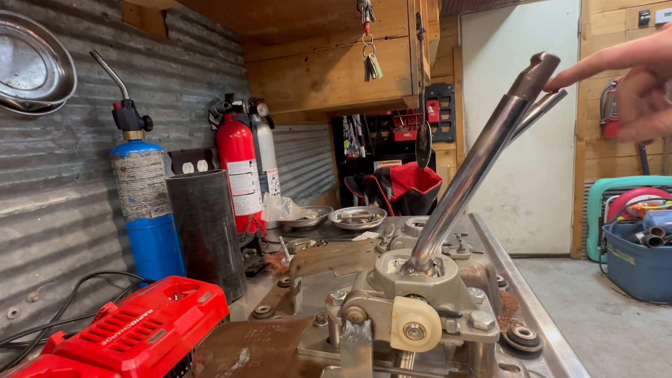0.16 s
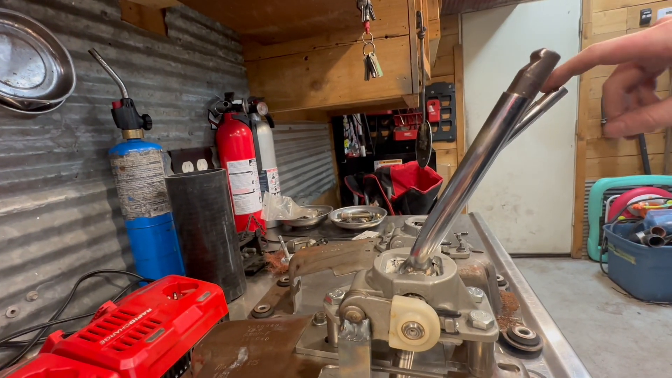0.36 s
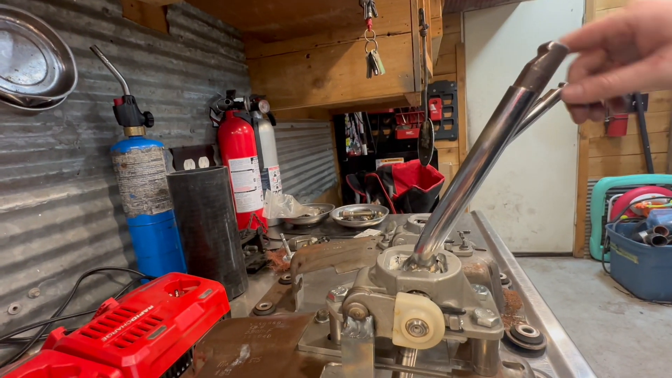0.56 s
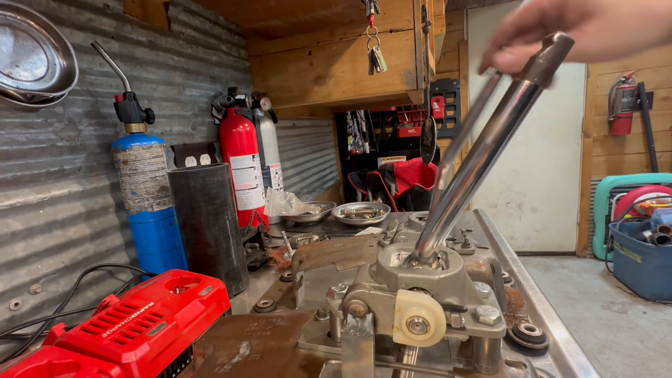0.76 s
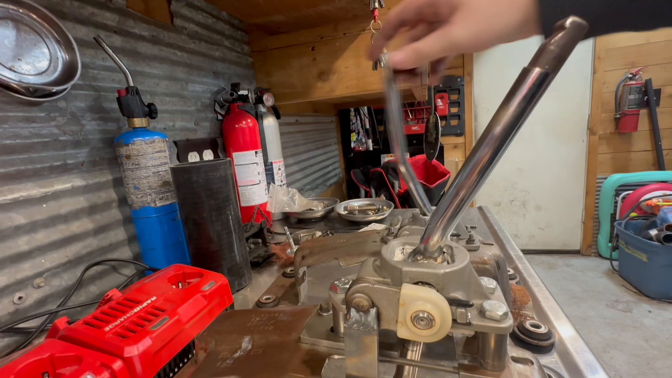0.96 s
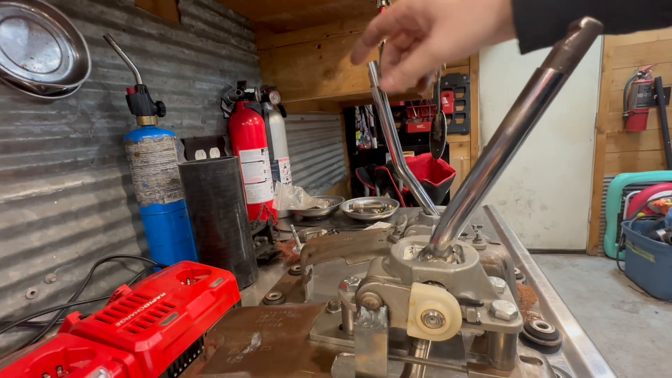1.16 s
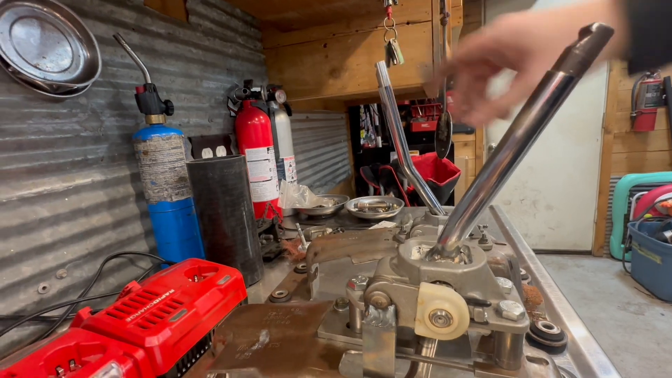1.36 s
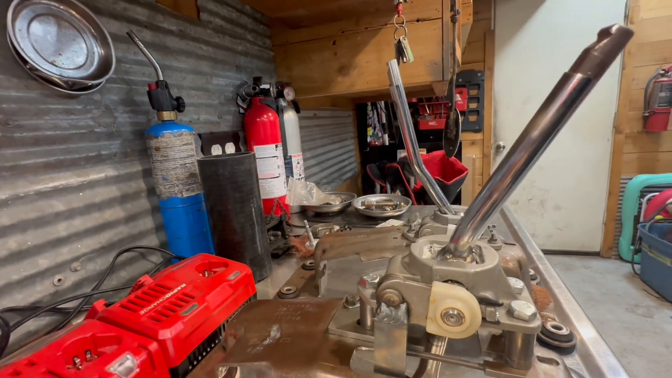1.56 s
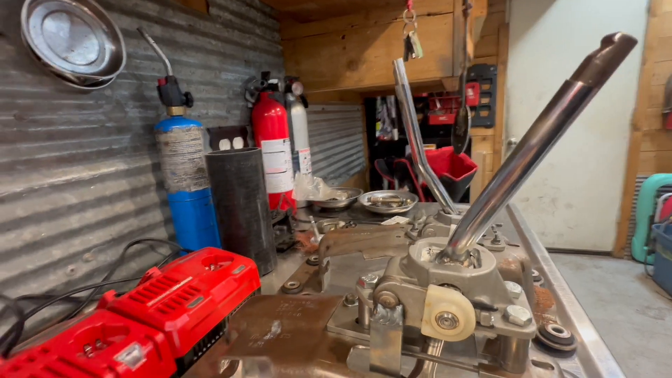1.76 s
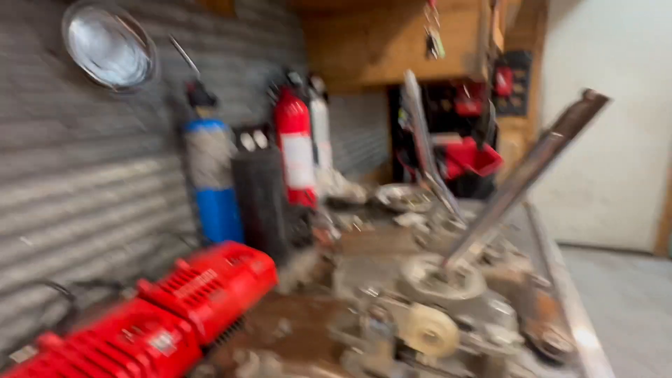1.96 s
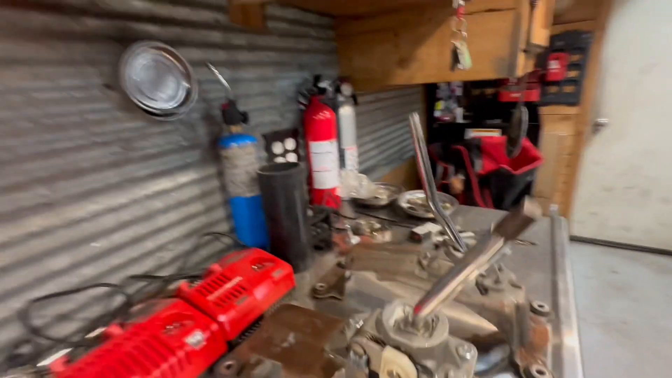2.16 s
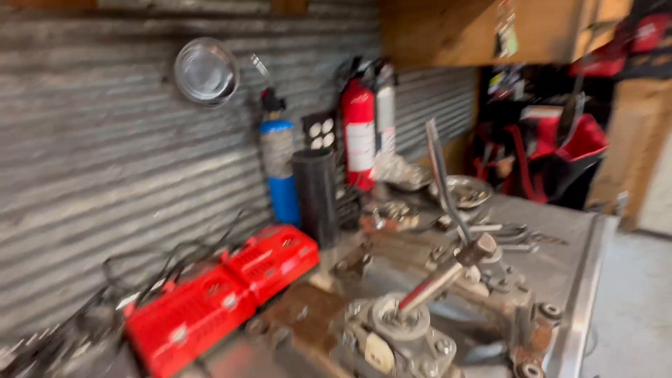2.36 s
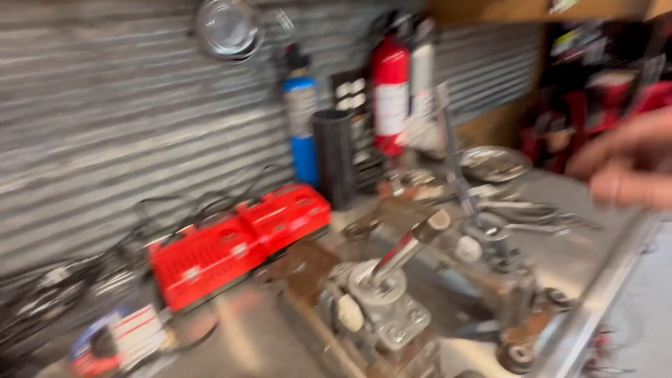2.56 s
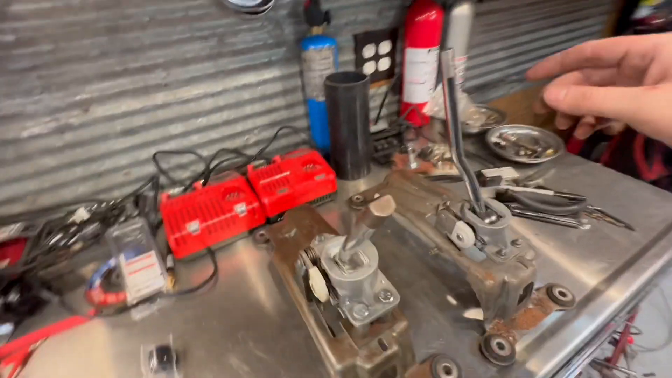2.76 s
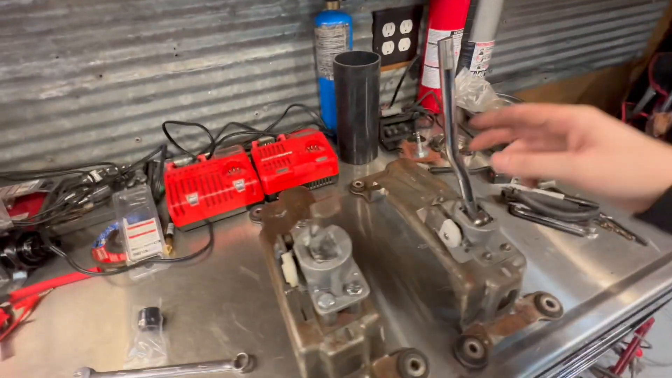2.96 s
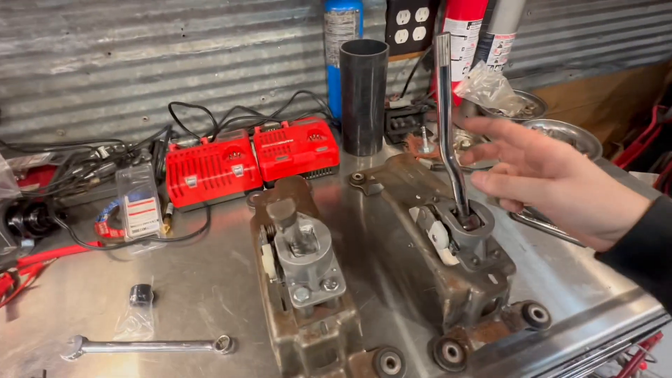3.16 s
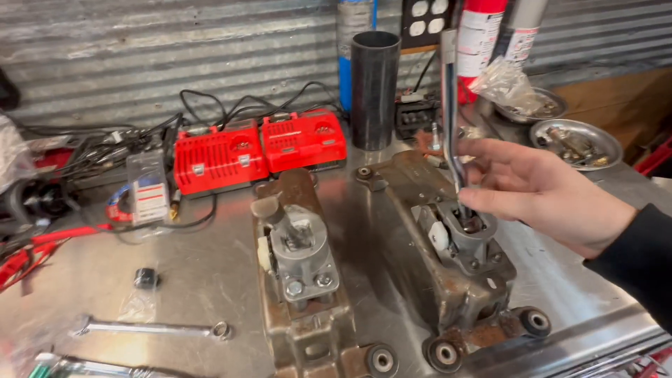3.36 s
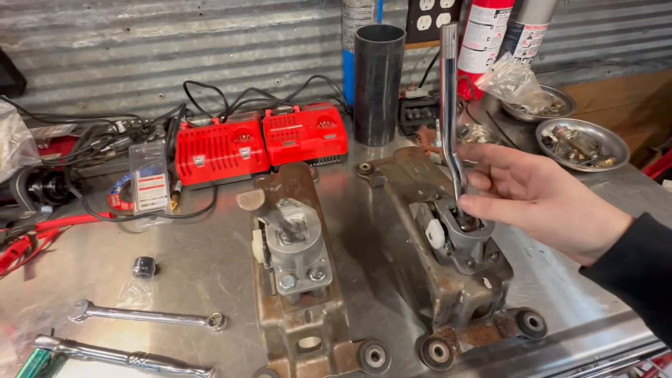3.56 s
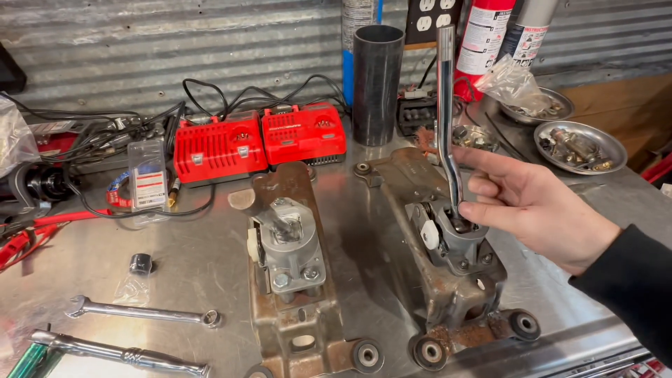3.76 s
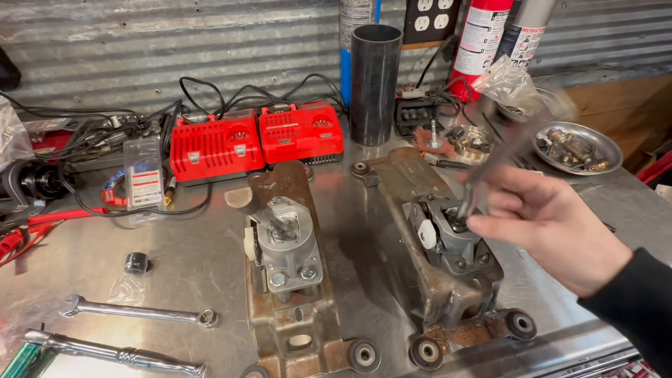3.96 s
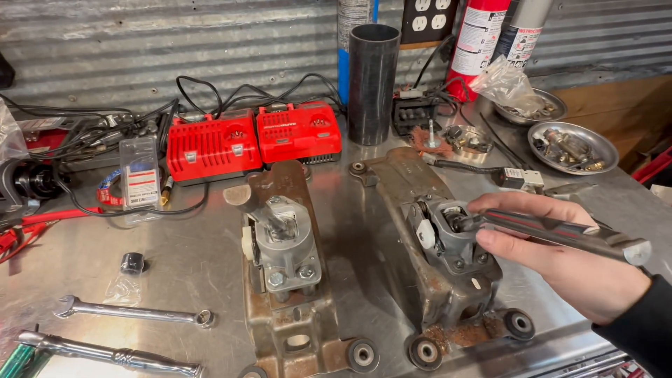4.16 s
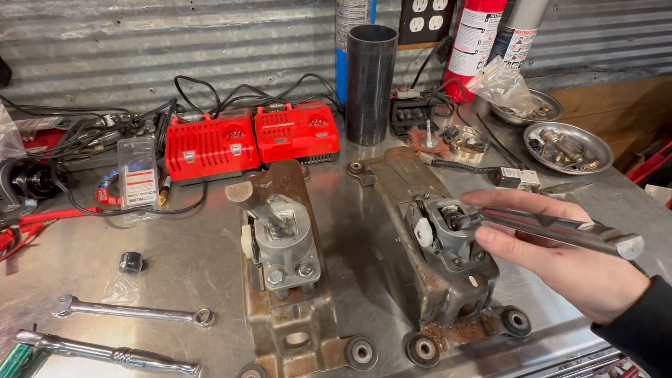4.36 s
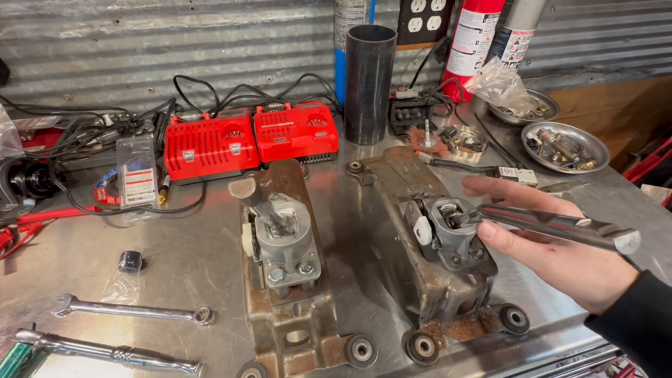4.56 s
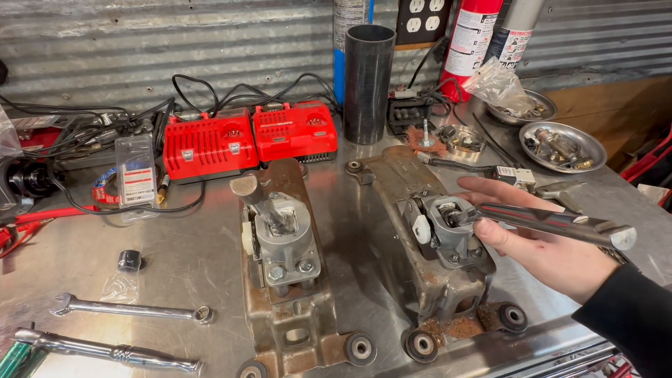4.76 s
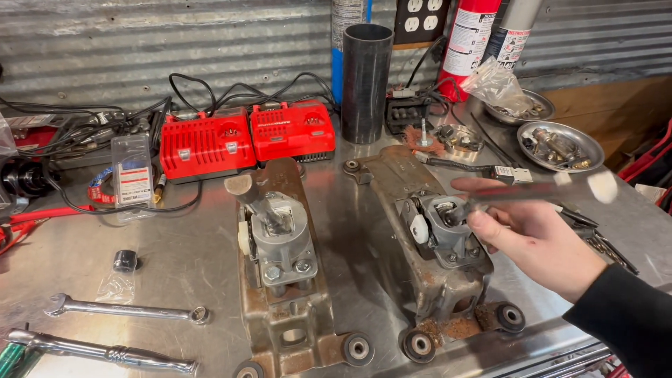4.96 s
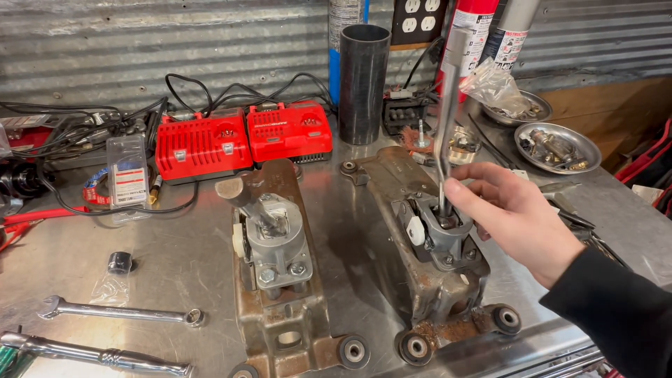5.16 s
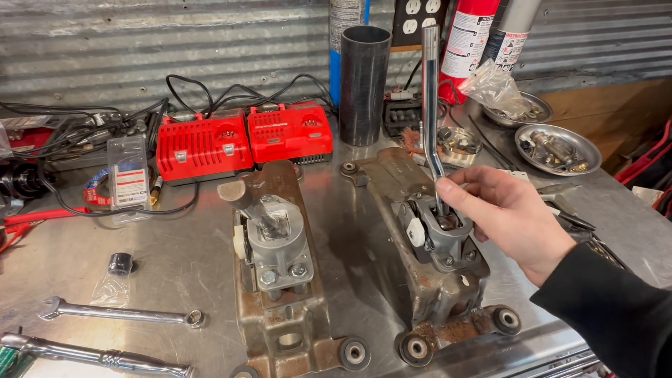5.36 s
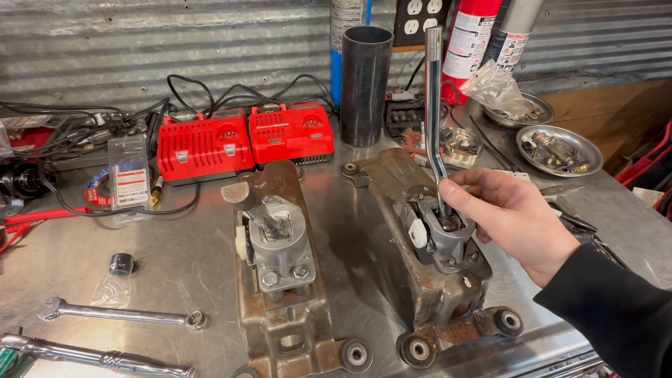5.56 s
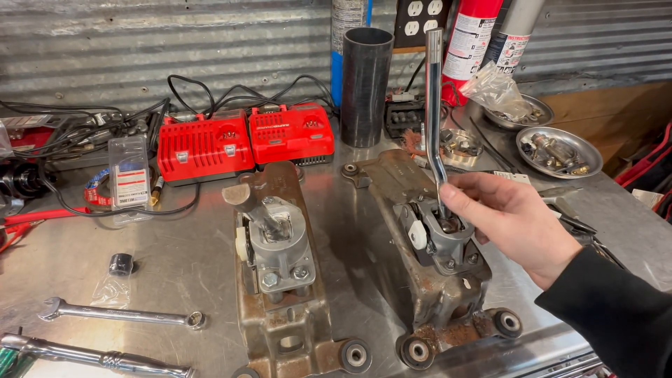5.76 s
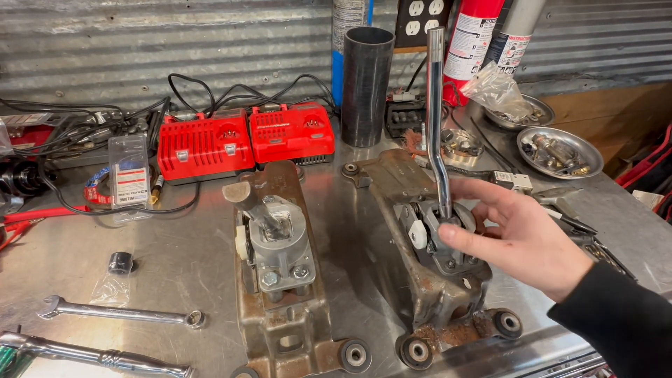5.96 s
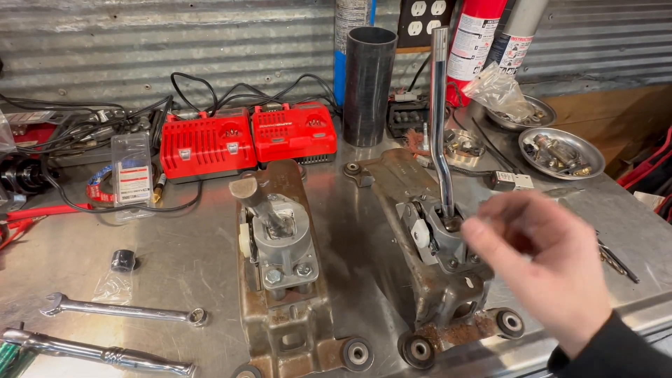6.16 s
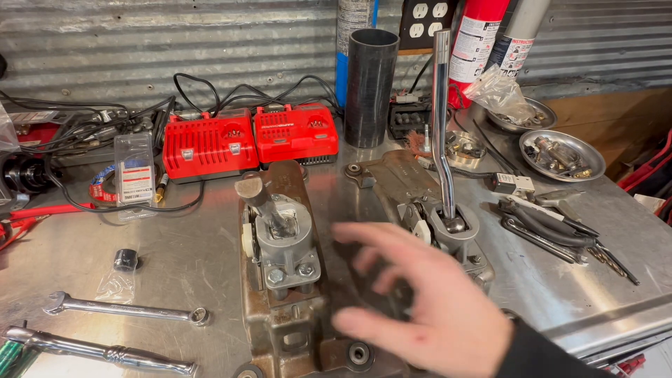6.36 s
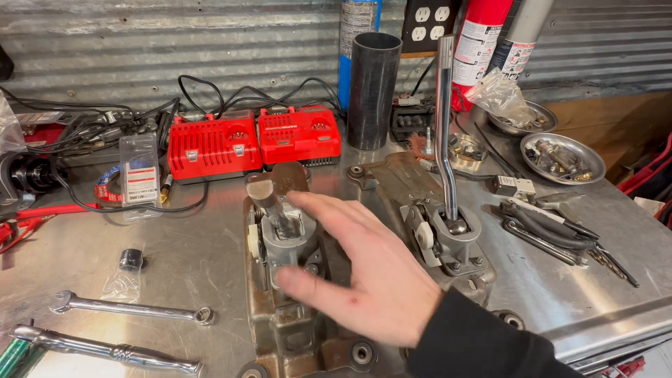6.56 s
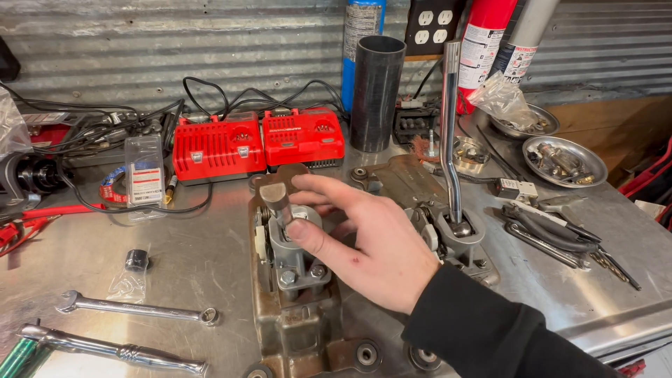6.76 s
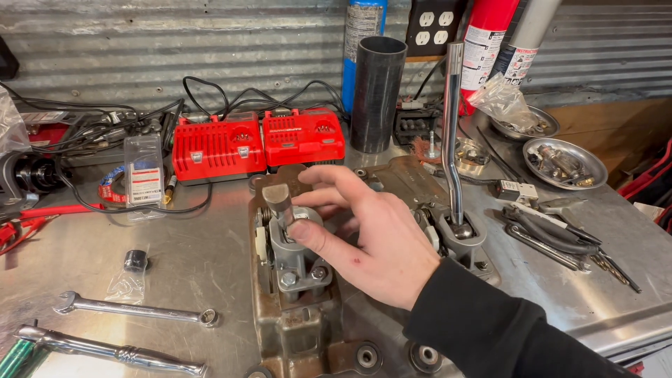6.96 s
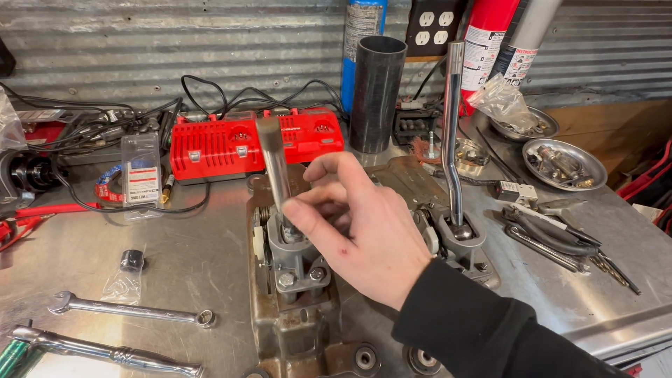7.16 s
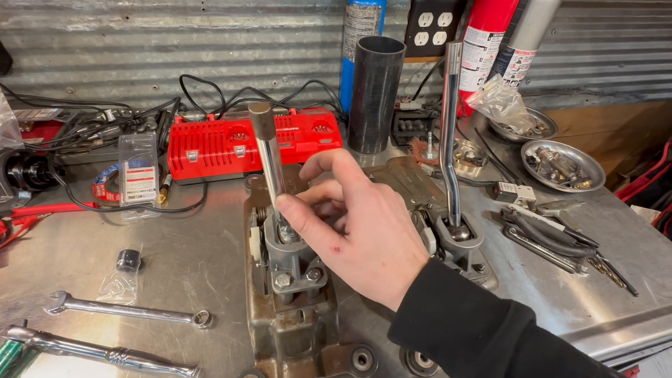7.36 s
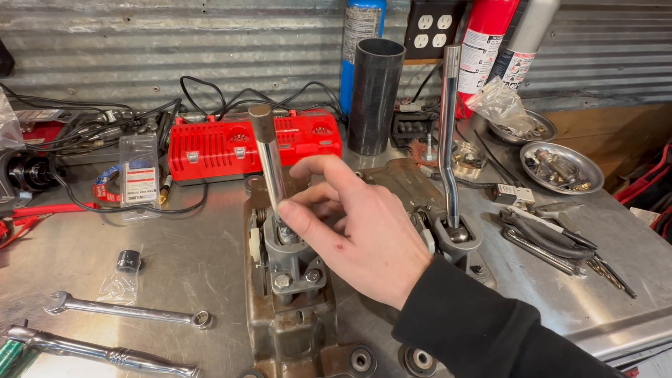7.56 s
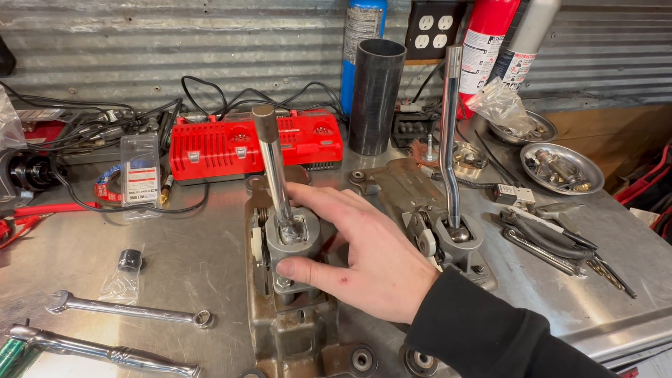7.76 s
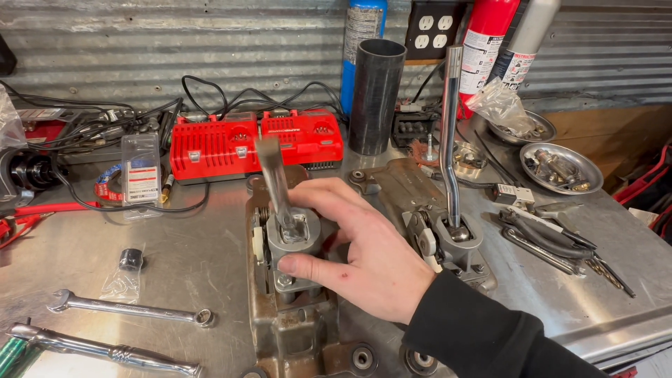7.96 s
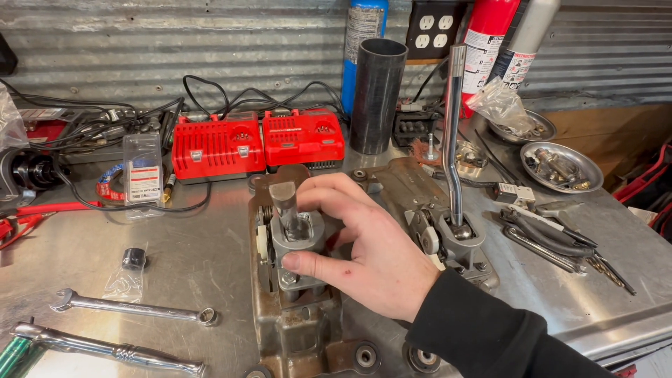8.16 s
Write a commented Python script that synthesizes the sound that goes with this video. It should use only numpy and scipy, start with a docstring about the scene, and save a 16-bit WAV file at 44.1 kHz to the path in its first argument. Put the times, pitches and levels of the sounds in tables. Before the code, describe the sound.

Bare gear shifters are flipped by hand, giving sharp metallic clunks with short ringing, above steady mains hum and soft rushing air.

```python
"""A steel lever clacks against its stop over mains hum, motor tones and a rush of air in a garage.
Two bare gear shifters, one long and one stub, are flipped from stop to stop on a steel workbench.
Each blow is shaped noise plus dying sines for lever and housing; slower sines make the bench boom.
Noise bursts make the sleeve's swishes, light ticks of the hand and one bright rebound of the long lever;
decaying noise bands reverberate the work."""
import sys
import numpy as np
from scipy import signal
from scipy.fft import rfft, irfft, next_fast_len
from scipy.io import wavfile

SR = 44100
rng = np.random.default_rng(int(sys.argv[2]) if len(sys.argv) > 2 else 0)


def pcm_store(signal):
    """Save signal as 16-bit PCM."""
    levels = np.round(np.clip(np.atleast_2d(signal), -1, 1) * 32767)
    wavfile.write(sys.argv[1], SR, levels.astype(np.int16).T)


N = 365588
TIME = np.arange(N) / SR   # t/s in the scene
AGE = TIME[:SR // 2]   # t/s since a blow
LOW_CUT_HZ, CUTOFF_HZ = 35, 15900

# Blows of each lever on a stop: [t/s, stop, ring level/dB, clack level/dB, clack tilt/(dB per octave),
# left-right level/dB]
LONG_HITS = [(0.000, "down", -12.5, -8.5, 0.6, 4.5), (0.022, "down", -21, -15, 1, 4),
             (0.9938, "up", -7.5, -8, 0.5, 4), (4.0395, "down", 0.5, -0.5, 0.5, 2),
             (4.105, "down", -28, -21.5, -2.5, 4), (5.2022, "up", 1, -3.5, 1, 2),
             (5.236, "up", -20, -24, -2, 7)]
STUB_HITS = [(7.2028, "up", -1, -4, -1, 3.5), (8.0196, "down", -1.5, -1.5, 1.5, 4.5),
             (8.036, "down", -14, -7, -4, 4), (8.0855, "down", -26, -29, -2, 12)]
# Mode clusters of each lever: [f/Hz, t60/s, relative level/dB at the down stop, at the up stop]
LONG_MODES = [(557, 0.13, -32.5, -43), (960, 0.054, -41, -27.5), (1073, 0.074, -25.5, -25),
              (1168, 0.047, -17, -16.5), (1282, 0.08, -43, -23), (1380, 0.045, -51, -13),
              (1523, 0.044, -16.5, -17), (2100, 0.026, -50, -21), (2366, 0.029, -15.5, -23),
              (3184, 0.043, -22.5, -28.5), (3880, 0.021, -28, -22.5), (4510, 0.03, -24.5, -36),
              (5700, 0.049, -35, -35), (6500, 0.023, -35.5, -67), (7800, .05, -40.5, -60),
              (11000, 0.031, -37.5, -41)]
STUB_MODES = [(562, 0.1, -34, -32.5), (836, 0.067, -30, -22), (1123, 0.086, -27, -18.5),
              (1368, 0.11, -20, -27.5), (1496, 0.086, -34, -28), (1984, 0.064, -24, -43),
              (2115, 0.043, -34, -23), (2380, 0.063, -27, -20.5), (2614, 0.052, -20, -15),
              (2786, 0.041, -17, -19), (3040, 0.078, -17.5, -39), (3480, 0.059, -40, -27),
              (4370, .07, -24, -40), (4640, 0.051, -39, -17.5), (5500, 0.062, -24.5, -46),
              (5870, 0.046, -23, -17), (6550, 0.065, -35, -30), (7880, 0.055, -28, -24.5),
              (8300, 0.18, -36, -60), (10600, 0.061, -29, -36)]
# Light parts of the stub lever that shimmer on: [f/Hz, t60/s, relative level/dB at the down stop, at the up stop]
SHIMMER_MODES = [(2700, 0.47, -41, -51), (4750, 0.52, -50, -61), (5320, 0.37, -39, -63),
                 (5670, .42, -38, -58), (5900, 0.31, -41, -51)]
# Crowds of short-lived housing modes, before each blow's level and tilt: [f/Hz, level/(dB per Hz)]
LONG_CLACK = [(200, -54), (450, -63.5), (800, -53), (1300, -50), (1800, -56.5), (3300, -59), (5500, -69.5),
              (10000, -79), (15500, -93.5)]
STUB_CLACK = [(200, -65), (450, -64), (800, -55), (1300, -49), (2700, -54), (3700, -57), (5700, -58),
              (7500, -70), (11000, -72), (15500, -80)]
# Treble balance of the microphone ports for close sounds: [f/Hz, left-right level/dB]
PORT_BALANCE = [(1000, -1), (2800, -1.5), (4500, 2), (6500, 6.5), (9000, -3.5), (15000, -5)]
# Position of the microphone: [t/s, 1 by the wall .. 0 over the bench]
BY_WALL = [(0, 0.92), (1.7, 1), (2.3, 0.18), (3.2, 0.13), (8.29, 0.15)]
# Steady tones of mains and motor, before they wander: [f/Hz, rms level/dB by the wall, over the bench,
# left-right level/dB by the wall, over the bench, phase lead of the left/rad]
HUM = [(120.0, -37.4, -36.3, 2, -1.9, .33), (138.6, -50.5, -51, 6, -5.5, .8),
       (277.3, -51.5, -57.5, -1, 3.5, -.7), (360.2, -69, -64.5, 0, 3, .4),
       (387.8, -70, -66.5, 3, -1.5, -.4), (415.8, -60.5, -57, -9, 8, 1.2), (610.1, -68, -71, -3, 4.5, -1.4),
       (694, -65, -72, 2, 4, -1.1), (730, -59.5, -64.5, 6, 8, 1.7), (840, -73, -69, -2, 12, -1.5),
       (1109, -66, -71.5, -2, 6, 1.7)]
# Rush of air everywhere, off the wall alone, and over the bench alone: [f/Hz, level/(dB per Hz)]
AIR = [(20, -92), (35, -80), (55, -63), (72, -72), (100, -68.5), (160, -79.5), (330, -82), (500, -81.5),
       (730, -82), (1200, -88.5), (2200, -95), (4200, -103), (6500, -103), (9500, -114), (12000, -121),
       (15500, -128)]
WALL_AIR = [(100, -100), (190, -78.5), (450, -103), (800, -95), (1000, -89), (1400, -88), (1900, -99),
            (2600, -112), (5000, -125)]
BENCH_AIR = [(500, -100), (900, -88.5), (1400, -89), (2500, -100), (4200, -102), (6500, -103),
             (9500, -113.5), (12000, -121), (15500, -128)]
# How the room reaches the two sides: [f/Hz, likeness 0-1, left-right level/dB]
SIDES = [(105, 1, -4.5), (190, .75, -3.5), (332, 0.7, 2), (546, 0, 3), (2280, 0, 4), (5340, 0, 6.5),
         (8160, 0, 6.5), (11500, 0.97, -2.5)]
# Bench top rocking under each blow: [t/s, f/Hz, level/dB]
THUMPS = [(0.002, 97.7, -15), (1.003, 109, -15.5), (4.042, 89, -16), (5.206, 89, -15.5), (7.208, 83, -26),
          (8.023, 89, -15.5)]
# Other bench modes: [f/Hz, level/dB against the rocking, t60/s]
BENCH_MODES = [(60, -11.5, 0.33), (147.7, -7, 0.099), (200.3, -5.5, 0.092), (283.8, -5, 0.071),
               (318, -8.5, 0.083)]
# Decay of the reverberation: [f/Hz, t60/s]
GARAGE_T60 = [(100, 0.11), (500, 0.33), (2000, 0.44), (6000, 0.45), (14000, 0.12)]
# Reverberation against direct sound: [f/Hz, level/dB]
GARAGE_DB = [(100, -17), (500, -4), (1300, -17), (3000, -18), (6000, -17.5), (14000, -55)]
# Sleeve swishes: [t/s at the fastest moment, length/s, level/dB, tilt/(dB per octave)]
SWISHES = [(1.671, 0.35, -2.5, -5), (1.945, 0.12, -15, 1), (2.395, .1, -12.5, 1), (2.823, 0.14, -2, -1),
           (3.001, 0.18, 3, -1), (6.484, 0.14, -19, 2.5)]
# Sleeve spectrum before each swish's level and tilt: [f/Hz, level/(dB per Hz)]
SLEEVE_COLOUR = [(500, -105), (2000, -91), (4000, -90), (8000, -92.5), (12000, -100), (15500, -104)]
# Light ticks of handling, and at 5.251 s the long lever's bright rebound: [t/s, level/dB]
TICKS_AND_REBOUND = [(1.903, 7), (2.505, -3), (2.5717, 8.5), (5.251, 9.5)]
# Spectrum of ticks and rebound before each one's level: [f/Hz, level/(dB per Hz)]
TICK_COLOUR = [(1000, -75), (3000, -92), (6000, -90.5), (11000, -97), (15500, -108)]
# Narrow dips in the microphone's response: [f/Hz, width/Hz]
MIC_DIPS = [(5200, 150), (7560, 210)]


def from_db(db):
    """A level in decibels is twenty times the logarithm of the amplitude ratio."""
    return 10 ** (np.asarray(db) / 20)


def at_hz(points, hz, axis=1):
    """A spectrum is interpolated linearly against the logarithm of frequency."""
    table = np.array(points)
    return np.interp(np.log(np.maximum(hz, 1)), np.log(table[:, 0]), table[:, axis])


def pan(db):
    """A left-right level difference is shared equally between two gains."""
    return from_db(np.array([[.5], [-.5]]) * db)


def dying(t60):
    """Damping proportional to velocity gives exponential decay: 60 dB in t60 seconds."""
    return np.exp(-np.log(1000) * AGE / t60)


def swelling(rise_s):
    """A delayed build-up starts from rest with zero slope."""
    return 1 - np.exp(-(AGE / rise_s) ** 2)


def add(out, s, sound):
    """Superposition: pressures from separate events sum."""
    start = max(round(s * SR), 0)
    out[:, start:start + sound.shape[-1]] += sound[..., :N - start]


def noise(colour, size, tilt_db=0, sided=1):
    """Partial coherence: a shared and an opposed noise mix by the likeness of the sides at each frequency."""
    padded = next_fast_len(size)
    hz = np.fft.rfftfreq(padded, 1 / SR)
    alike = np.clip(at_hz(SIDES, hz), 0, 1)
    mid, side = rfft(rng.standard_normal((2, padded)))
    both = np.sqrt(1 + alike) * mid + np.sqrt(1 - alike) * side * [[1], [-1]]
    octaves = np.log2(np.maximum(hz, 1) / 2000)   # the tilt pivots at 2 kHz
    gain = from_db(at_hz(colour, hz) + tilt_db * octaves)
    balance = pan(sided * at_hz(SIDES, hz, axis=2))
    density_scale = np.sqrt(SR) / 2   # makes a 0 dB colour unit power per Hz
    return irfft(both * gain * balance, padded)[:, :size] * density_scale


def mode(hz, t60, spread):
    """A damped normal mode is a dying sine; its phase differs between the sides in proportion to spread."""
    offset = spread * rng.uniform(-0.33, 0.47) * np.array([[1], [-1]])
    phase = rng.uniform(0, 2 * np.pi) + offset
    return np.sin(2 * np.pi * hz * AGE + phase) * dying(t60)


def cluster(hz, t60, width, count=4):
    """Closely spaced modes of a casting beat against each other."""
    offsets = (np.arange(count) + rng.random(count)) / count - .5
    modes = [mode(hz * (1 + width * offset), t60, spread=1.76) for offset in offsets]
    return sum(modes) / np.sqrt(count)


def lever(hits, modes, clack_colour, clack_t60, chatter_s, chatter_db, crack_db,
          rattle_db, rattle_t60, width):
    """Impact excitation: steel cracks on its stop and chatters once; the stop sets each cluster's amplitude."""
    out = np.zeros((2, N))
    # first touch, second touch, then loose parts buzzing out: delay/s, level/dB, t60/s
    touches = [(0, 0, clack_t60), (chatter_s, chatter_db, clack_t60), (chatter_s, rattle_db, rattle_t60)]
    for s, stop, ring_db, clack_db, tilt_db, pan_db in hits:
        ring = 0
        for hz, t60, down_db, up_db in modes:
            mode_db = up_db if stop == "up" else down_db
            ring = ring + from_db(mode_db) * cluster(hz, t60, width)
        ring = ring * (1 - np.exp(-AGE / 0.0014))   # the ringing takes a moment to spread through the housing
        crack = from_db(crack_db) * noise(clack_colour, len(AGE), tilt_db - 1.0, sided=0) * dying(t60=0.005)
        blow = from_db(ring_db) * ring + from_db(clack_db) * crack
        add(out, s, blow * pan(pan_db))
        for delay, touch_db, t60 in touches:
            clack = noise(clack_colour, len(AGE), tilt_db, sided=0) * dying(t60)
            add(out, s + delay, from_db(clack_db + touch_db) * clack * pan(pan_db))
    return out


def ports(x):
    """Linear filtering: each microphone port weights the close sounds' spectrum a little differently."""
    size = next_fast_len(N + len(AGE))
    balance = pan(at_hz(PORT_BALANCE, np.fft.rfftfreq(size, 1 / SR)))
    return irfft(rfft(x, size) * balance, size)[:, :N]


def drift(rate):
    """A slow random fluctuation joins unit-deviation normal values, rate per second, separately on each side."""
    knots = rng.standard_normal((2, 64))
    return np.array([np.interp(TIME * rate, np.arange(len(k)), k) for k in knots])


def hum(by_wall, wander_db=4.5, full_wander_hz=300):
    """Standing waves make a tone's level depend on place; its wander grows with frequency up to a limit."""
    out = np.zeros((2, N))
    for hz, wall_db, bench_db, wall_pan_db, bench_pan_db, lead in HUM:
        phase = rng.uniform(0, 2 * np.pi) + lead * np.array([[.5], [-.5]])
        wander = wander_db * min(hz / full_wander_hz, 1) ** 2 * drift(rate=1.2)
        db = bench_db + by_wall * (wall_db - bench_db) + wander
        sides = pan(bench_pan_db + by_wall * (wall_pan_db - bench_pan_db))
        tone = np.sqrt(2) * np.sin(2 * np.pi * hz * TIME + phase)   # unit rms
        out += from_db(db) * sides * tone
    return out


def air_rush(by_wall):
    """Broadband flow noise: a steady part, a part off the wall alike on both sides, and hiss over the bench."""
    everywhere = noise(AIR, N)
    off_wall = noise(WALL_AIR, N, sided=0)[0]
    over_bench = noise(BENCH_AIR, N)
    return everywhere + by_wall * off_wall + (1 - by_wall) * over_bench


def bench(swell_s=0.012, rock_t60=0.16, upper_swell_s=0.015):
    """Slow bending waves make the bench boom some milliseconds after the clack."""
    out = np.zeros((2, N))
    for s, rock_hz, blow_db in THUMPS:
        rock = mode(rock_hz, rock_t60, spread=0.55) * swelling(swell_s)
        rest = sum(from_db(db) * mode(hz, t60, spread=1.0) for hz, db, t60 in BENCH_MODES)
        add(out, s, from_db(blow_db) * (rock + rest * swelling(upper_swell_s)))
    return out * pan(db=1.5)


def garage(dry):
    """Diffuse reverberation: the impulse response is noise decaying at its own rate in each octave."""
    edges = 62.5 * 2 ** np.arange(9)
    response = 0
    for low, high in zip(edges, edges[1:]):
        hz = np.sqrt(low * high)
        fade = dying(at_hz(GARAGE_T60, hz)) * swelling(0.0033)
        octave = signal.butter(2, [low, high], "band", fs=SR, output="sos")
        band = signal.sosfilt(octave, rng.standard_normal((2, len(AGE))))
        energy = np.sum(fade ** 2)
        response = response + from_db(at_hz(GARAGE_DB, hz)) * band * fade / np.sqrt(energy)
    return signal.fftconvolve(dry, response, axes=1)[:, :N]


def sleeve(snag_db=1.5, snags_per_s=90):
    """Friction noise: cloth swells and fades with the speed of each reach, snagging as it slides."""
    out = np.zeros((2, N))
    second = TIME[:SR]   # each swish lies in the middle of one second
    for s, length_s, db, tilt_db in SWISHES:
        speed = np.exp(-(2 * (second - .5) / length_s) ** 2)
        knots = rng.standard_normal(size=400)
        snags = np.interp(second * snags_per_s, np.arange(len(knots)), knots)
        cloth = noise(SLEEVE_COLOUR, SR, tilt_db, sided=0)
        add(out, s - .5, speed * from_db(db + snag_db * snags) * cloth)
    return out


def ticks_and_rebound(burst_t60=0.015):
    """Brief contact: each touch of the hand, and the long lever's rebound, is a heavily damped noise burst."""
    out = np.zeros((2, N))
    for s, db in TICKS_AND_REBOUND:
        add(out, s, from_db(db) * noise(TICK_COLOUR, len(AGE), sided=0) * dying(burst_t60))
    return out


def scene():
    """Superposition of levers, bench and hand, their reverberation, and the room's own tones and air."""
    long_lever = lever(LONG_HITS, LONG_MODES, LONG_CLACK, clack_t60=0.063, chatter_s=.0033,
                       chatter_db=-9.5, crack_db=7, rattle_db=-16.5, rattle_t60=0.25, width=0.036)
    stub_lever = lever(STUB_HITS, STUB_MODES + SHIMMER_MODES, STUB_CLACK, clack_t60=0.054, chatter_s=.0043,
                       chatter_db=-2.5, crack_db=-4.0, rattle_db=-21.5, rattle_t60=0.46, width=.04)
    work = ports(long_lever + stub_lever) + bench() + sleeve() + ticks_and_rebound()
    by_wall = np.interp(TIME, *np.transpose(BY_WALL))
    return work + garage(work) + hum(by_wall) + air_rush(by_wall)


def record(dry):
    """Band limiting: the microphone drops the deepest bass and dips narrowly in the treble; the top is cut steeply."""
    dry = signal.sosfilt(signal.butter(5, LOW_CUT_HZ, "high", fs=SR, output="sos"), dry)
    for hz, width_hz in MIC_DIPS:
        dry = signal.lfilter(*signal.iirnotch(hz, hz / width_hz, fs=SR), dry)
    return signal.sosfilt(signal.ellip(10, .1, 90, CUTOFF_HZ, fs=SR, output="sos"), dry)


dry = scene()
out = record(dry)
pcm_store(out)
```